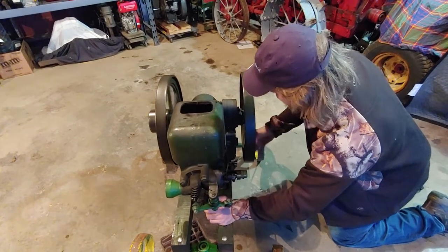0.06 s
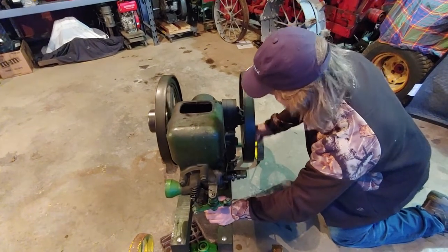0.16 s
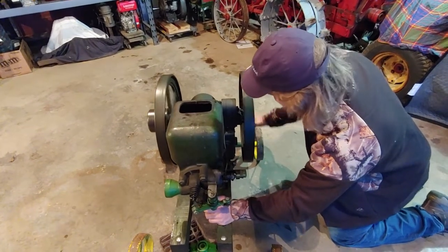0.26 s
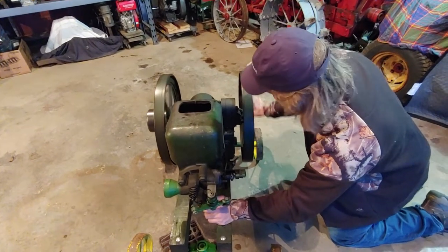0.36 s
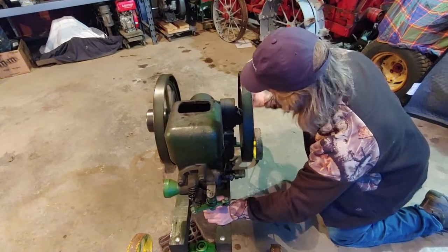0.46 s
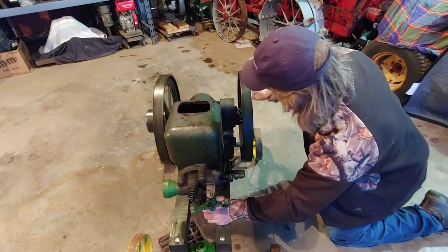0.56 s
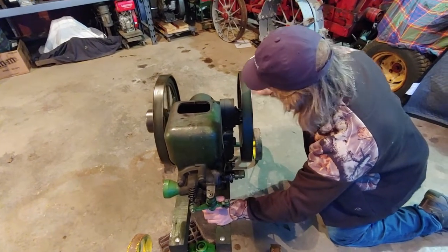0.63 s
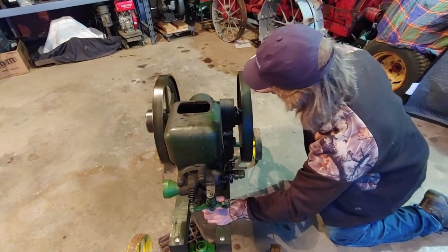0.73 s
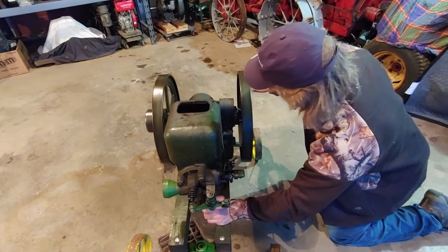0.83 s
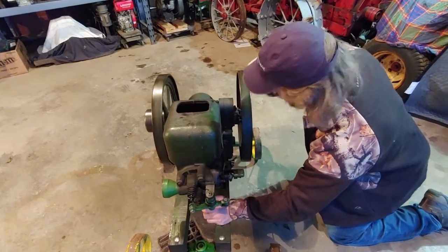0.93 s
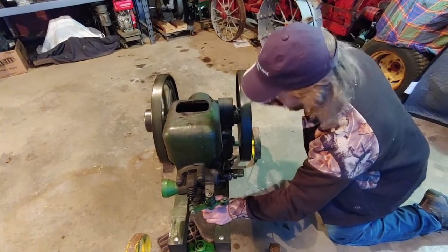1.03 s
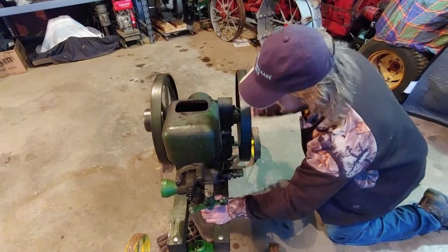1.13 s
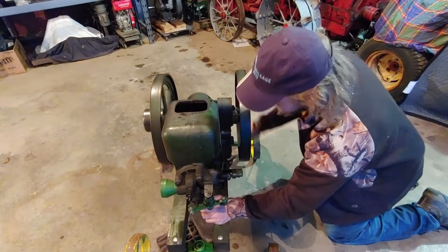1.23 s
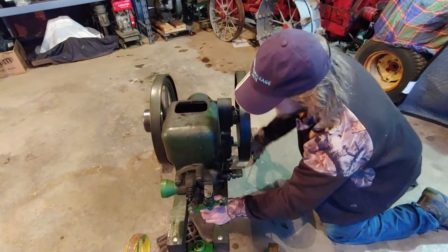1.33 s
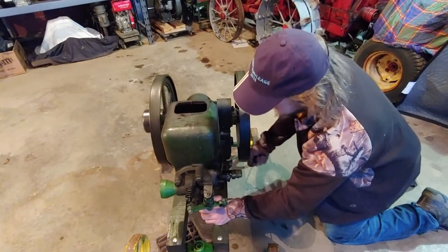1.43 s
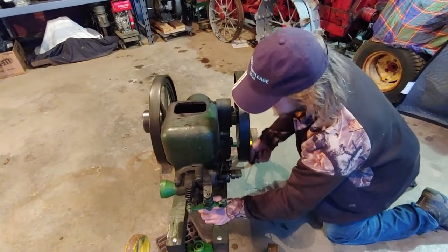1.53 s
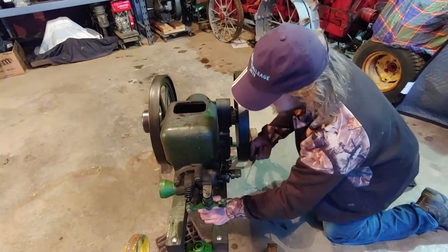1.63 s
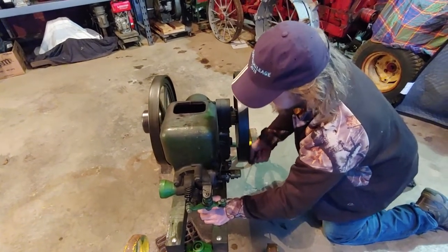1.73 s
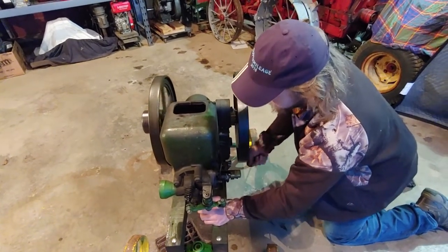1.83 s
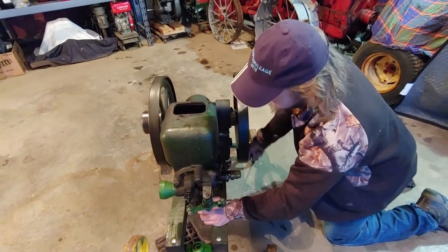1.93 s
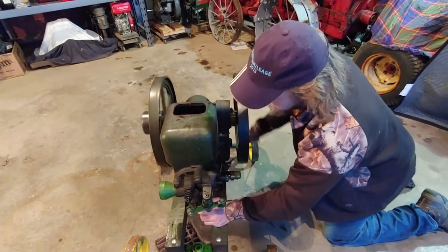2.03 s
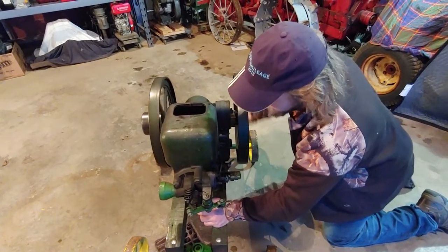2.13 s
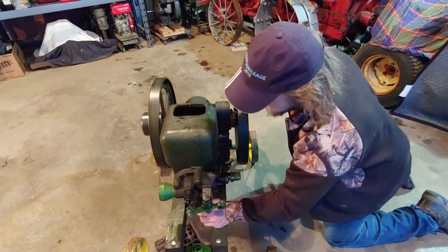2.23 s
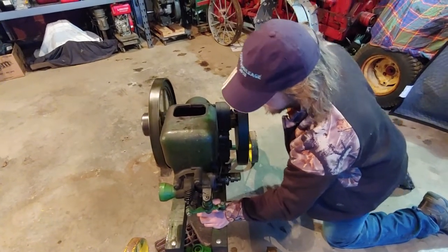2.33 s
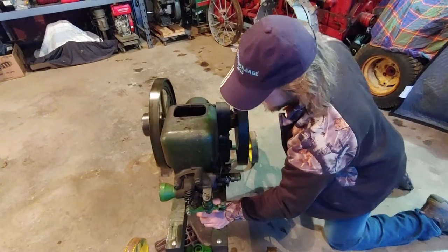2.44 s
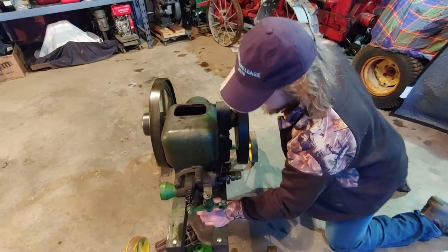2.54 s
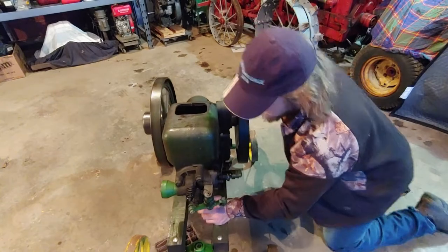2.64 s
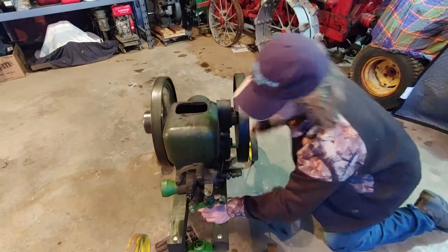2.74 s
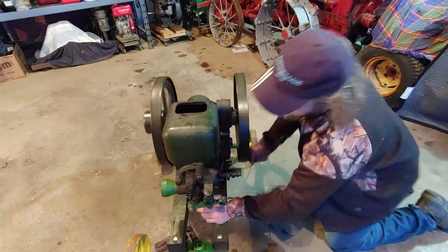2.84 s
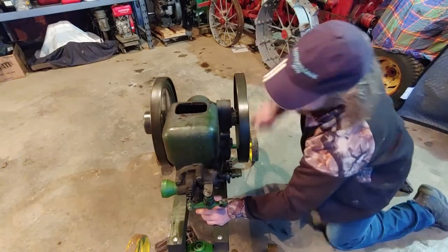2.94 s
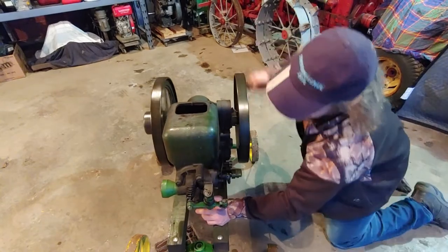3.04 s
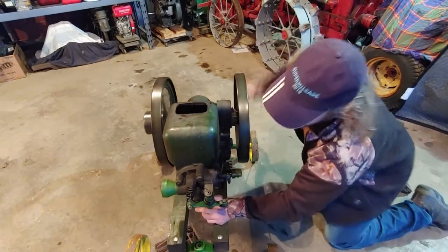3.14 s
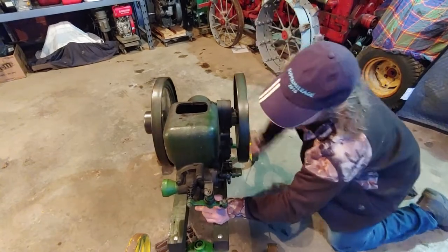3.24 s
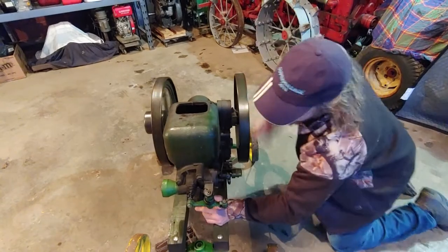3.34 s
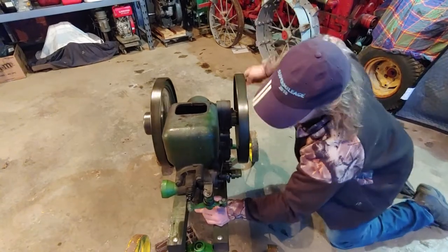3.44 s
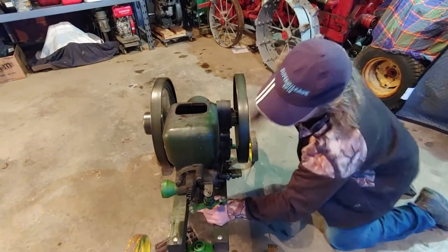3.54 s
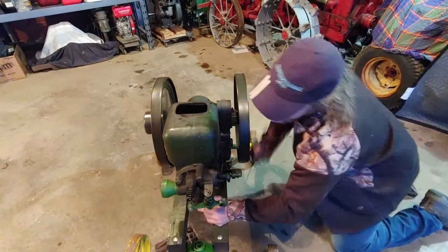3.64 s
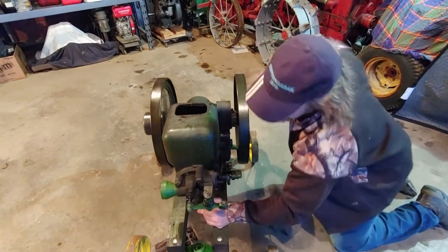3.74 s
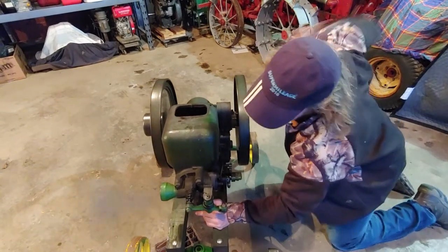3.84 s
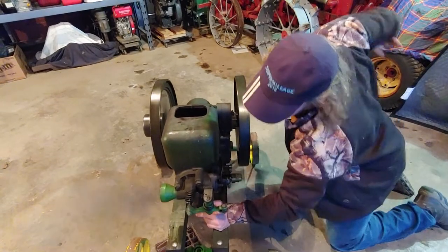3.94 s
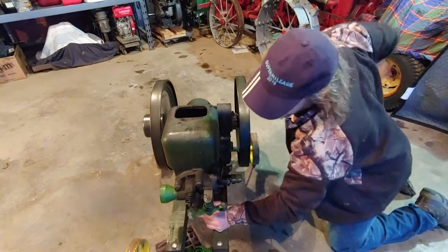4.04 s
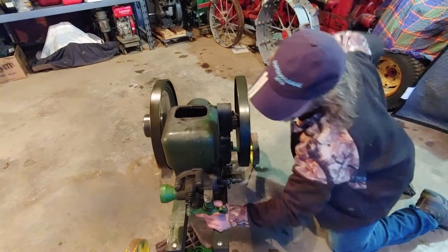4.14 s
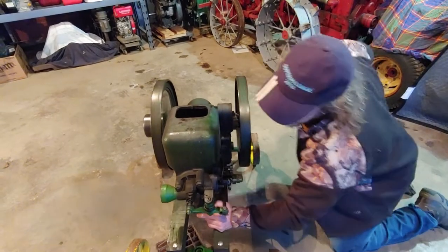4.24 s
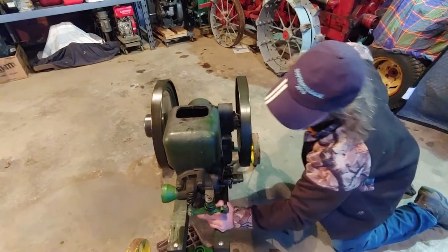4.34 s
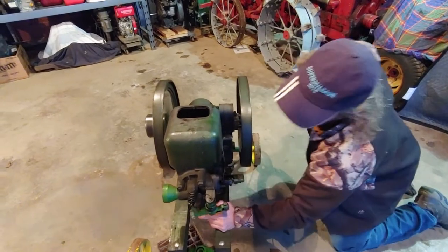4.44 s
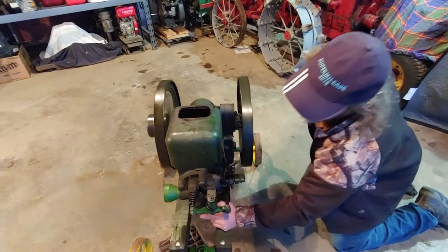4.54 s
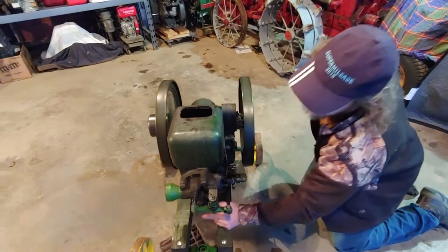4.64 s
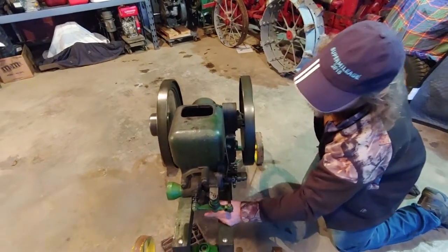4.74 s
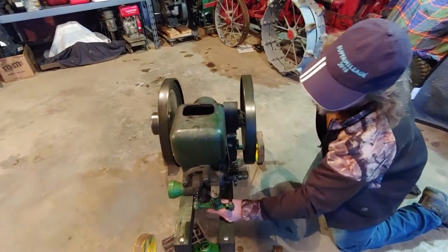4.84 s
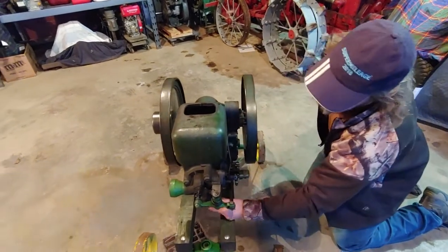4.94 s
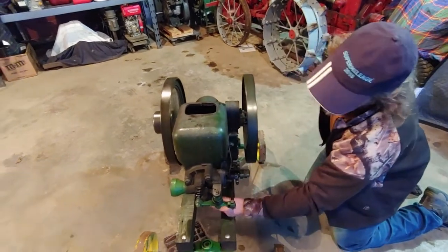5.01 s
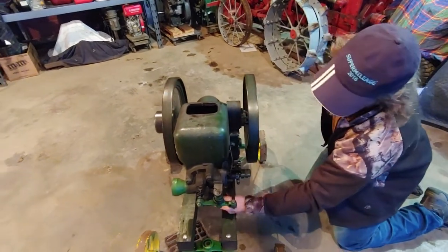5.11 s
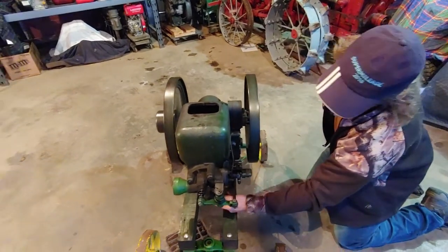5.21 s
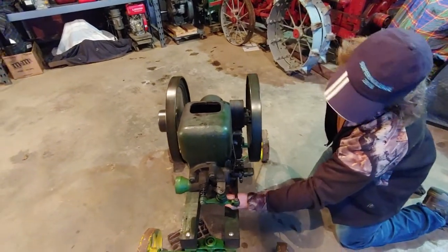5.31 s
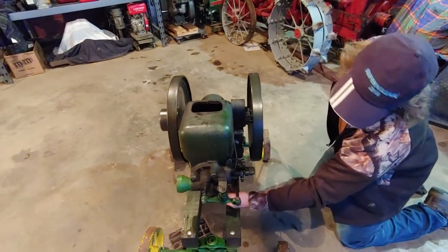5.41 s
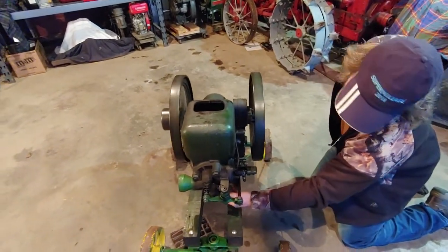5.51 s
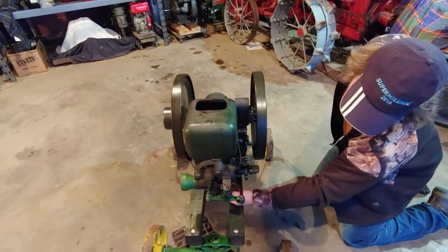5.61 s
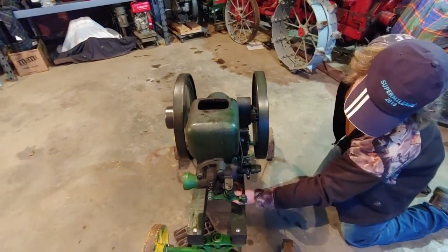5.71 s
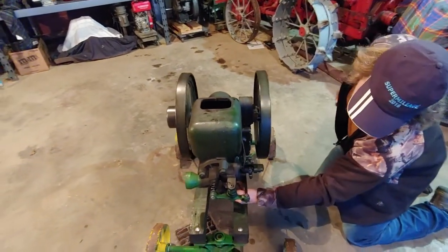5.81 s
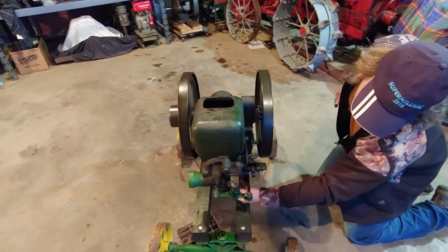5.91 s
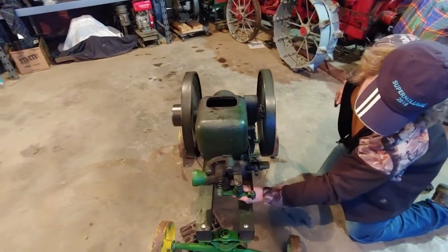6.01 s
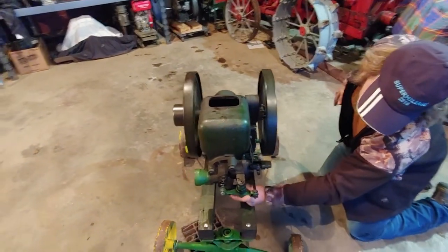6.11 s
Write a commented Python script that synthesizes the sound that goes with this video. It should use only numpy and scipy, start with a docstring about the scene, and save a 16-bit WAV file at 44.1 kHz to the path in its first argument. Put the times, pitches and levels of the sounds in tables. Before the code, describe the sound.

A close stereo microphone in a garage, loudest peaks clipping. At 0 s a loose steel crank handle clanks hard onto the shaft, several rattling contacts in 0.1 s with a bright ring; a weaker clank comes at 0.83 s. Until 2.5 s it is nearly quiet: faint room tone, small ticks, thin wheezes near 0.5, 1.4 and 2.3 s, a light igniter click at 1.98 s. From 2.65 s knocks and raspy air grow. Hard, dry igniter snaps hit at 3.03, 3.77, 4.18 and 4.58 s, among clacking valve gear, short breathy whistles and low cart hum. Charges fire at 3.87 and 4.66 s, each a sharp pop with muffler ring and strong falling hiss. From 4.85 to about 6.2 s the engine coasts: bright hissing pants, about six or seven a second, stronger and weaker alternating, rattling plates, low chuffs and a soft knock every second turn, slowing very slightly.

```python
"""An old single-cylinder engine in a garage: a steel crank handle clanks on, the flywheels are wound by hand,
air wheezes through the valves, the igniter snaps, two charges fire and the engine coasts, panting at every turn.
Air is coloured noise that swells with each stroke; metal is bursts of chatter sent through ringing modes.
The cart under it hums with filtered noise; a close stereo microphone clips the loudest peaks."""
import sys
import numpy as np
from scipy import signal
from scipy.fft import rfft, irfft, next_fast_len
from scipy.io import wavfile
from scipy.ndimage import uniform_filter1d, map_coordinates

SR = 44100
rng = np.random.default_rng(int(sys.argv[2]) if len(sys.argv) > 2 else 0)


def unload_wav(signal):
    """Save mono or channel-first audio to the path in sys.argv[1] as 16-bit WAV at rate SR, clipped to [-1, 1]."""
    wavfile.write(
        sys.argv[1],
        SR,
        np.round(np.clip(np.atleast_2d(signal).T, -1, 1) * 32767).astype(np.int16),
    )


N = 272052

# All levels in the tables are relative: the layers may scale them further.
# Strokes of one coasting cam cycle, two turns long. Each row: start in turns, length in turns,
# jet level in dB, pipe level in dB, chuff level in dB, change of the jet over the stroke in dB.
CAM_STROKES = [(0.018, 0.33, -13.5, -18.5, -27.5, -8), (.45, 0.49, -20, -24, -30.5, -5.5),
               (1.01, 0.39, -14.5, -18.5, -27, -6.5), (1.45, 0.35, -18, -23, -28, -6.5)]
# Colours of the three voices of the air. Each row: frequency in Hz, level in dB.
JET_COLOUR = [(2710, -20.5), (4600, -13), (7270, 2.5), (8380, -5), (11900, -17), (15500, -27)]
PIPE_COLOUR = [(710, -35), (1200, -24.5), (1420, -9.5), (1630, -7.5), (2240, -5), (2550, -1.5), (4700, -7),
               (6110, -36), (10300, -120)]
CHUFF_COLOUR = [(120, -17.5), (200, -9.5), (332, -1), (472, -3.5), (680, -4.5), (850, 1), (1250, -2),
                (1620, -43.5), (2750, -120)]
# Colour of the quiet room. Each row: frequency in Hz, level in dB.
ROOM_COLOUR = [(88, -31.5), (150, 8.5), (242, 5.5), (856, -40.5), (2570, -9), (7310, -16), (12000, -38.5),
               (15600, -60.5), (22000, -120)]
# How alike left and right are. Each row: frequency in Hz, likeness (1 is identical).
LIKENESS = [(60, .99), (300, .94), (700, .84), (1400, .5), (2500, .12)]
# How the two microphone ports differ. Each row: frequency in Hz, left minus right in dB.
PORT_LEAN = [(60, -0.5), (380, 1), (950, -1), (2380, -8), (5980, 5.5), (8200, -6), (11000, -4.5),
             (15000, 0)]
# Crank handle contacts. Each row: start in seconds, peak in dB, extra ring of the sleeve in dB,
# time for the chatter to fall 60 dB in seconds.
HANDLE_CONTACTS = [(0, 1.5, 24, 0.035), (.032, -5.5, 24.5, 0.098), (.056, -11, -9, 0.039),
                   (.08, -7.5, 18, 0.096), (.097, -14, 2, 0.26), (.357, -39.5, -17, 0.06),
                   (.395, -38, -26, 0.038), (.568, -39.5, -13.5, 0.057), (.812, -32, -16, 0.08),
                   (.832, -11, -10.5, 0.078), (.85, -22, -13, 0.2)]
# Ringing modes of the handle. Each row: frequency in Hz, level in dB, time to fall 60 dB in seconds.
HANDLE_MODES = [(982, -44, 0.59), (1690, -11, 0.27), (1786, -8.5, .6), (1847, -8.5, 0.31),
                (1866, -7.5, .35), (1968, -10.5, 0.57), (2340, -23, .17), (2890, -5.5, 0.43),
                (3000, -1, 0.31), (3263, -7, 0.34), (3517, 0.5, 0.58), (3920, -6.5, 0.21),
                (4170, -8.5, .25), (4340, -13, 0.2), (4710, -13.5, .2), (4940, -10.5, 0.28),
                (5530, -14.5, 0.24), (5700, -19.5, .22), (6180, -15, 0.15), (7140, -12.5, .16),
                (7604, -4.5, 0.22), (7820, -20.5, 0.2), (8330, -14.5, 0.2), (9400, -14.5, 0.11),
                (9920, -29.5, .2), (10350, -22, .12)]
# Igniter trips. Each row: start in seconds, peak in dB, extra ring above 6 kHz in dB,
# time for the chatter to fall 60 dB in seconds.
IGNITER_TRIPS = [(1.9804, -15, 1.5, 0.06), (3.0332, 3.5, -13.5, 0.014), (3.7652, 3, -19, 0.0052),
                 (4.1791, 3, -5.5, 0.0084), (4.5832, 3, -4.5, 0.018)]
# Ringing modes of the igniter. Each row: frequency in Hz, level in dB, time to fall 60 dB in seconds.
IGNITER_MODES = [(1540, -4, 0.067), (1878, -9.5, 0.33), (2570, -13, 0.057), (3620, -12.5, 0.11),
                 (3790, -23, 0.27), (4360, -20.5, 0.071), (5060, -11, 0.11), (5380, -15, 0.073),
                 (6400, -11, .09), (7830, -5.5, 0.065)]
# Ticks and knocks of push rod, cam and valves. Each row: start in seconds, bright level in dB,
# clank of the frame's upper modes in dB, clunk of its lower modes in dB, pitch it rings most near in Hz.
GEAR_KNOCKS = [(0.4964, -68, -35.5, -28, 2580), (0.591, -41, -38, -47, 1600),
               (1.1467, -63.5, -50, -43, 1170), (1.2648, -69, -38.5, -51.5, 2600),
               (1.4045, -73, -40.5, -27, 1580), (1.4504, -38, -39, -46, 1580),
               (2.129, -39.5, -48, -43, 1900), (2.254, -72, -33, -31, 2380), (2.3293, -30, -50, -43, 2600),
               (2.6547, -24, -39, -55, 3400), (2.7389, -39, -24, -20, 1150), (2.8586, -22, -37, -35, 800),
               (2.8746, -17.5, -32, -31, 1850), (3.0978, -22, -38, -26, 1850),
               (3.2139, -14, -16, -28, 1292), (3.234, -14, -47, -45, 1600), (3.476, -0.5, -29, -39, 2600),
               (3.4993, -4.5, -40, -42, 2900), (3.6002, -6, -30, -42, 2600), (3.622, -3, -28, -45, 2600),
               (4.0477, -5, -28, -33, 2400), (4.1, -1.5, -24, -36, 2404), (4.2522, -5.5, -21, -15.5, 1200),
               (4.2698, -2, -33, -40, 3400), (4.397, -3.5, -8.5, -7, 2483), (4.42, -13, -14, -12, 2390),
               (4.4468, -1, -22, -36, 2600), (5.343, -10.5, -13, -35, 1573), (5.5564, -6, -22, -34, 2600)]
# Charges that fire. Each row: start in seconds, level in dB.
FIRINGS = [(3.866, -4.5), (4.658, -7.5)]
# Resonances of the muffler. Each row: frequency in Hz, width in Hz, level in dB.
MUFFLER_MODES = [(313.6, 55, 4), (783, 123, -5), (1440, 400, -4.5)]
# Shaking of the cart. Each row: time in seconds, hum level in dB, thud level in dB.
CART_LEVELS = [(0, -68, -57.5), (.15, -41, -55.5), (.82, -68, -70.5), (1.45, -40.5, -52), (2.1, -67, -66),
               (2.4, -68.5, -60), (2.7, -37, -53), (3.42, -52, -51), (3.5, -38.5, -41), (3.69, -35.5, -50),
               (3.8, -57, -84), (3.88, -37, -32), (4.22, -44, -44), (4.37, -38, -40), (4.48, -32.5, -30.5),
               (4.6, -53.5, -58), (4.69, -38.5, -33), (5.24, -56, -48.5), (5.45, -34.5, -43),
               (6.17, -52.5, -57)]
# Short wavering whistles. Each row: start in seconds, length in seconds, start pitch in Hz,
# end pitch in Hz, width in Hz, level in dB.
WHISTLES = [(2.57, 0.2, 1500, 1440, 90, -45.5), (3.265, 0.055, 403, 483, 69.5, -28.5),
            (3.31, 0.082, 860, 855, 121, -33.5), (3.324, 0.074, 1560, 1550, 159, -27.5),
            (3.383, 0.037, 1620, 1680, 172, -20), (3.034, .13, 1607, 2025, 460, -25.5),
            (3.774, 0.071, 1562, 1940, 460, -24.5), (4.18, 0.098, 1600, 1990, 392, -25.5),
            (2.34, 0.16, 1900, 2670, 903, -42.5), (3.49, .16, 2800, 2900, 760, -24.5),
            (4.586, 0.12, 1600, 2100, 403.4, -26)]
# How the garage echo dies. Each row: frequency in Hz, time to fall 60 dB in seconds.
GARAGE_DECAY = [(200, 1), (2000, 0.31), (10000, 0.21)]
# Loose plates that the flow rattles (later raised to the power 1.5).
# Each row: frequency in Hz, width in Hz, level in dB.
PLATE_MODES = [(1125.6, 26, -0.5), (1334, 86, -1), (1647, 79, 4), (1861, 56, 2), (2040, 59, 2),
               (2425, 35, 0.5), (2595, 64, 1.5)]
# Broad colour of steel on steel (later cubed). Each row: frequency in Hz, width in Hz, level in dB.
STEEL_COLOUR = [(1680, 140, -6), (3300, 1300, -1.5), (5420, 1100, 1.5), (7600, 1900, 1)]
# Strokes that push or draw air while cranking and catching. Each row: start in seconds, length in seconds,
# jet hiss in dB, pipe rush in dB, low chuff in dB, change of the jet over the stroke in dB.
CRANKING_STROKES = [(.495, 0.11, -72, -61.5, -59, 1), (.57, 0.12, -54.5, -61, -81, -7),
                    (1.14, 0.25, -93, -82, -65.5, 22), (1.395, 0.072, -65, -70, -54, 2),
                    (1.445, 0.156, -49.5, -53.5, -59, 2), (1.82, 0.14, -63.5, -63.5, -75, -1),
                    (1.975, 0.041, -43.5, -43.5, -60, -13), (2.255, 0.073, -63, -54.5, -52.5, 7.5),
                    (2.33, 0.14, -45.5, -46.5, -61, 2), (2.53, 0.1, -46, -57, -76, 1),
                    (2.655, 0.091, -43.5, -46, -60, -1.5), (2.73, 0.04, -54, -47.5, -42, 5),
                    (2.87, 0.18, -36, -38.5, -49, 13), (3.035, 0.21, -19, -28, -51, -20),
                    (3.21, 0.041, -25, -27.5, -33.5, -10), (3.32, 0.14, -31, -33.5, -38, 5.5),
                    (3.475, 0.12, -14, -30.5, -65, -3), (3.63, 0.064, -25, -32.5, -37.5, -3),
                    (3.71, 0.053, -27.5, -39, -39.5, 8.5), (3.77, 0.092, -19.5, -28.5, -38.5, -9),
                    (3.863, 0.21, -10.5, -22.5, -38.5, -18.5), (4.04, 0.14, -21.5, -34, -41.5, 0),
                    (4.18, .06, -19, -26, -59, -7), (4.245, 0.1413, -24.5, -27, -33, -2.5),
                    (4.395, 0.075, -18.5, -25.5, -30.5, -0.5), (4.5, 0.099, -28.5, -57, -37, 3.5),
                    (4.585, 0.063, -23.5, -28, -28, 2.5), (4.657, 0.22, -8, -24, -36, -24.5)]
# Air that seeps between strokes. Each row: time in seconds, jet level in dB.
SEEPAGE = [(0, -68.5), (1.1, -77), (2.2, -70), (2.5, -70), (2.85, -51), (3.3, -41), (3.7, -37),
           (4.85, -30.5), (6.17, -27)]
# Where the modes of the loose grip sleeve lie. Each row: lowest Hz, highest Hz.
SLEEVE_BANDS = [(900, 1000), (7300, 7800)]
# The knock of each cam cycle. One row: bright level in dB, clank in dB, clunk in dB, pitch it rings near in Hz.
CYCLE_KNOCK = (-29, -20, -19.5, 1200)
# Modes of the cast-iron frame. Each row: frequency in Hz, width in Hz, level in dB.
FRAME_MODES = [(474, 84, -1), (760, 250, -1.5), (1226, 335, -4), (1583, 130, 0), (1900, 240, -6),
               (2403, 160, -4), (2650, 130, -2.5), (2980, 180, -9), (3570, 290, -10.5)]

COAST_S, TURN_S, SLOWING_S = 4.854, 0.1506, 0.0012  # first dead centre, first turn, each turn longer by
COAST_SWELL_DB_PER_S = 0.54
SETTLE_DB, SETTLE_S = -2.5, 0.059  # the first coasting strokes are weaker, and this soon fades
CAM_KNOCK_TURNS = 0.86  # place of the push rod's knock in the cam cycle
PIPE_FOLLOWS, CHUFF_FOLLOWS = 0.72, 0.06  # share of the jet's change
LEAK_PIPE_DB, LEAK_CHUFF_DB = 0.5, 1  # over the seeping jet
LEAK_CHUFF_TOP_DB = -50.5  # the chuff of the seepage grows no further
OPEN_S, CLOSE_T60_S = 0.024, 0.26  # rise of a stroke; time for its release to fall 60 dB
PIPE_LEADS_S = 0.007  # pipe and chuff speak before the jet
FULL_DB, SLOW_DB = -24, -53.5  # jet level of a fast and of a slow flow
SLOW_PIPE_HZ = 3736  # a slow flow keeps only the pipe's lower part
SLOW_RIGHT_DB = 0.5  # a slow flow leans right, towards the intake
PLATES_DB = 0.5  # plates' level over the pipe rush when its flow is at RATTLE_FROM_DB
RATTLE_FROM_DB, RATTLE_GROWS = -17.5, 0.35  # reference pipe level; rattle dB per dB of pipe flow
RISE_S, DULL_RISE_S = 0.00094, 0.001  # build-up of struck handle and igniter; of the frame's knocks
UPPER_HZ = 1000  # upper and lower modes of the frame part here
NEAR_DB, NEAR_OCTAVES = 9, 0.33  # modes close to the struck spot's pitch stand out
LOW_DROP_S, LOW_DROP_DB = 0.062, -9  # for this long after each trip the chuff and (by half the dB) the cart drop
PAUSE_TURNS, PAUSE_WIDTH_TURNS = -0.07, 0.09  # the piston halts by dead centre: place and width
PAUSE_EVEN_DB, PAUSE_ODD_DB = -4, -2  # depth of the halt at even and odd turns
TOP_HZ = 15665  # nothing is kept above this


def amp(db):
    """Turn decibels into a plain multiplier."""
    return 10 ** (np.asarray(db) / 20)


def along(points, hz):
    """Read (Hz, value) points on a log frequency axis, as pitch is heard."""
    f, v = np.transpose(points)
    return np.interp(np.log(hz + 1), np.log(f + 1), v)


def curves(rows, at):
    """Read each column after the first at the given places."""
    places, *columns = np.transpose(rows)
    return np.array([np.interp(at, places, column) for column in columns])


def wobble(rate):
    """A smooth random curve with `rate` knots a second."""
    knots = rng.standard_normal(int(N * rate / SR) + 4)
    return map_coordinates(knots, [np.arange(N) * rate / SR])


def filtered(x, response):
    """Multiply the spectrum of x by a response of frequency."""
    m = next_fast_len(N + SR // 2)
    return irfft(rfft(x, m) * response(np.fft.rfftfreq(m, 1 / SR)), m)[..., :N]


def resonances(modes):
    """Response of bodies that ring after being driven, from (Hz, width Hz, dB) modes of alternating sign."""
    def response(f):
        return sum((-1) ** k * amp(db) * 1j * f * w / (c * c - f * f + 1j * f * w)
                   for k, (c, w, db) in enumerate(modes))
    return response


def coloured(points):
    """A response that follows (Hz, dB) points."""
    return lambda hz: amp(along(points, hz))


def at_ports(x):
    """The microphone body shades one port against the other."""
    return filtered(x, lambda hz: amp(along(PORT_LEAN, hz) / 2 * np.array([[1], [-1]])))


def rush(response, grit_db, patchy_db=2):
    """Stereo turbulence, middle at rms 1: noise with uneven grain and drifting patches of colour."""
    grains = rng.standard_normal((2, N)) * amp(grit_db * wobble(700))
    z = signal.stft(grains, nperseg=256)[2]
    patches = uniform_filter1d(rng.standard_normal(z.shape[1:]), size=4, axis=0)
    patches = uniform_filter1d(patches, size=14, axis=1)
    pair = signal.istft(z * amp(patchy_db * patches / np.std(patches)), nperseg=256)[1][:, :N]

    def shares(hz):
        angle = np.arccos(np.clip(along(LIKENESS, hz), -1, 1)) / 2
        return response(hz) * [np.cos(angle), np.sin(angle)]

    shared, own = filtered(pair, shares)
    both = at_ports(np.array([shared + own, shared - own]))
    return both / np.std(both.mean(axis=0))


def struck(events, modes, extra_bands, bass_hz, grip_s, crack_db, crack_s, crack_grows, colour):
    """Every blow is a dying chatter of contacts: a coloured crack, and the ring of the modes it drives."""
    rings, cracks = np.zeros((2, N + SR)), np.zeros((2, N + SR))
    t = np.arange(SR // 3) / SR
    rise = 1 - np.exp(-t / RISE_S)
    # rough castings split every mode into a close cluster of four
    hz, level, t60 = np.repeat(np.transpose(modes), 4, axis=1)[..., None]
    hz = hz * (1 + 0.0045 * rng.standard_normal(hz.shape))
    tones = amp(-60 * t / np.clip(t60, 0.03, 0.5)) * np.sin(2 * np.pi * hz * t) * rise
    for s, db, extra_db, chatter_s in events:
        in_bands = sum((hz > low) * (hz < high) for low, high in extra_bands)
        size = amp(level + extra_db * in_bands + 2 * rng.standard_normal(hz.shape))
        ring = size[:, 0] @ tones
        chatter = [[1, 0.99], [1, -0.8]] @ rng.standard_normal((2, len(t)))
        chatter = chatter * amp(-60 * t / max(chatter_s, 0.005)) * rise
        body = signal.fftconvolve(chatter, ring[None], axes=1)[:, :len(t)]
        body *= amp(-30 * (t / grip_s) ** 3) / np.abs(body).max()  # contact closes and stops the ringing
        start = round(max(s, 0) * SR)
        rings[:, start:][:, :len(t)] += amp(db) * body
        crack = amp(crack_grows * db + crack_db - 60 * t / crack_s) * rise
        cracks[:, start:][:, :len(t)] += crack * rng.standard_normal((2, len(t)))
    no_bass = signal.butter(4, bass_hz, "high", fs=SR, output="sos")  # small parts radiate no bass
    return signal.sosfilt(no_bass, rings[:, :N] + filtered(cracks[:, :N], colour))


def handle():
    """The loose steel crank rattles on the shaft, a little to the right; the hand damps it."""
    def colour(hz):
        return resonances(STEEL_COLOUR)(hz) ** 3
    rattle = struck(HANDLE_CONTACTS, HANDLE_MODES, SLEEVE_BANDS, bass_hz=850, grip_s=0.24,
                    crack_db=-11.0, crack_s=0.19, crack_grows=1.3, colour=colour)
    return at_ports(rattle) * amp([[-1.2], [1.2]])


def low_drop_db():
    """The brief drop of the low sounds after each trip."""
    t = np.arange(N) / SR
    dropped = sum((t > s) * (t < s + LOW_DROP_S) for s, *_ in IGNITER_TRIPS)
    return LOW_DROP_DB * uniform_filter1d(dropped * 1.0, size=300)


def cart():
    """The wooden cart shakes on its wheels: a fuzzy hum with an overtone, and a deeper thud."""
    levels_db = curves(CART_LEVELS, np.arange(N) / SR)
    hum, thud = amp(levels_db + low_drop_db() / 2 + 1.6 * wobble(12))

    def shake(modes):
        return rush(lambda hz: resonances(modes)(hz) ** 2, grit_db=-8.0, patchy_db=-1.0)

    return hum * shake([(109.0, 16.2, 4.0), (189.4, 42, -3.0)]) + thud * shake([(50.1, 54, 0)])


def room_tone():
    """The quiet room: steady, faint coloured noise."""
    return amp(-68.5) * rush(coloured(ROOM_COLOUR), grit_db=0.5)


def crank_time(turns):
    """Seconds at which the coasting, slowing flywheel has made so many turns."""
    return COAST_S + TURN_S * turns + SLOWING_S * turns ** 2 / 2


def strokes():
    """The listed cranking strokes, then the cam cycle repeated at flywheel speed."""
    coasting = []
    for cycle in range(5):
        for start, length, *level_db, change_db in CAM_STROKES:
            s = crank_time(2 * cycle + start)
            length_s = crank_time(2 * cycle + start + length) - s
            swell_db = COAST_SWELL_DB_PER_S * (s - COAST_S)
            swell_db += SETTLE_DB * np.exp((COAST_S - s) / SETTLE_S)
            coasting.append((s, length_s, *np.add(level_db, swell_db), change_db))
    return CRANKING_STROKES + coasting


def air_levels():
    """Jet, pipe and chuff dB: each stroke opens, drifts and closes over the seepage; powers add."""
    t = np.arange(N) / SR
    leak_db, = curves(SEEPAGE, t)
    leak_chuff_db = np.minimum(leak_db + LEAK_CHUFF_DB, LEAK_CHUFF_TOP_DB)
    power = amp([leak_db, leak_db + LEAK_PIPE_DB, leak_chuff_db]) ** 2
    lead = np.array([[0], [PIPE_LEADS_S], [PIPE_LEADS_S]])
    follows = np.array([[1], [PIPE_FOLLOWS], [CHUFF_FOLLOWS]])
    for s, length, *level_db, change_db in strokes():
        span = slice(round((s - PIPE_LEADS_S) * SR), round((s + length + CLOSE_T60_S) * SR))
        u = t[span] - s + lead
        drift_db = change_db * np.clip(u / length, 0, 1) * follows
        close_db = -60 * np.clip(u - length, 0, None) / CLOSE_T60_S
        opening = np.sin(np.pi / 2 * np.clip(u / OPEN_S, 0, 1))
        power[:, span] += (opening * amp(np.array(level_db)[:, None] + drift_db + close_db)) ** 2
    return 10 * np.log10(power)


def pause_db():
    """The flow dips as the coasting piston halts by each dead centre."""
    t = np.arange(N) / SR
    dips = 0
    for turn in range(1, 9):
        depth_db = PAUSE_EVEN_DB if turn % 2 == 0 else PAUSE_ODD_DB
        away = (t - crank_time(turn + PAUSE_TURNS)) / (PAUSE_WIDTH_TURNS * TURN_S)
        dips = dips + depth_db * np.exp(-away ** 2)
    return dips


def valve_air():
    """Three voices of the same flow: jet hiss, pipe rush with rattling plates, and low chuff."""
    jet_db, pipe_db, chuff_db = air_levels() + pause_db() + 0.63 * wobble(60)
    slow = np.clip((FULL_DB - jet_db) / (FULL_DB - SLOW_DB), 0, 1)
    jet = rush(coloured(JET_COLOUR), grit_db=1.5, patchy_db=1.5)
    # a slow flow keeps only the core of the jet
    core = filtered(jet, lambda hz: np.abs(resonances([(7500, 4300, 0.0048)])(hz)) ** 2)
    jet = jet + slow * (core - jet)
    plates = rush(lambda hz: resonances(PLATE_MODES)(hz) ** 1.5, grit_db=4, patchy_db=2.5)
    rattle_db = PLATES_DB + RATTLE_GROWS * np.clip(pipe_db - RATTLE_FROM_DB, -15, 5)
    pipe = rush(coloured(PIPE_COLOUR), grit_db=0.0, patchy_db=3.0) + plates * amp(rattle_db)
    lower = filtered(pipe, lambda hz: 1 / (1 + (hz / SLOW_PIPE_HZ) ** 6))
    pipe = pipe + slow * (lower - pipe)
    pipe = pipe * amp(1.2 * wobble(45) + 4 * slow * wobble(160))  # the pipe flutters; a slow flow rasps
    chuff = rush(coloured(CHUFF_COLOUR), grit_db=1.5, patchy_db=2.0)
    flow = (amp(jet_db) * jet + amp(pipe_db) * pipe) * amp(SLOW_RIGHT_DB * slow * [[-1], [1]])
    return flow + amp(chuff_db + low_drop_db()) * chuff


def valve_gear():
    """Each contact is bright steel chatter that also sets the iron frame ringing, each spot in its own way."""
    t = np.arange(SR // 8) / SR
    bright, frame = np.zeros(N + SR), np.zeros((2, N + SR))
    tick = amp(-6 - 60 * t / 0.049) * (1 - np.exp(-t / 0.002))
    knock = amp(-60 * t / 0.068) * (1 - np.exp(-t / DULL_RISE_S))
    chatter = [[1, 0.6], [1, -0.6]] @ rng.standard_normal((2, N)) * amp(4 * wobble(500))
    chatter = np.pad(at_ports(chatter), ((0, 0), (0, SR)))
    hz, width_hz, db = np.transpose(FRAME_MODES)[..., None]
    fade = np.pi * width_hz * t
    tones = width_hz * fade * np.exp(-fade) * np.sin(2 * np.pi * hz * t) * 2 * np.pi / SR
    cam_knocks = [(crank_time(2 * cycle + CAM_KNOCK_TURNS), *CYCLE_KNOCK) for cycle in range(4)]
    for s, bright_db, clank_db, clunk_db, near_hz in GEAR_KNOCKS + cam_knocks:
        span = slice(round(s * SR), round(s * SR) + len(t))
        near_db = NEAR_DB * np.exp(-(np.log2(hz / near_hz) / NEAR_OCTAVES) ** 2)
        blow_db = np.where(hz > UPPER_HZ, clank_db, clunk_db)
        size = amp(blow_db + db + near_db + 2 * rng.standard_normal(hz.shape))
        ring = size[:, 0] @ tones
        bright[span] += amp(bright_db) * tick
        body = signal.fftconvolve(knock * chatter[:, span], ring[None], axes=1)[:, :len(t)]
        # the blow sets the strength, not the luck of the noise
        frame[:, span] += body * np.linalg.norm(ring) * np.linalg.norm(knock) / np.linalg.norm(body)
    steel = rush(lambda hz: amp(along(JET_COLOUR, hz)) / (1 + (hz / 11000) ** 8), grit_db=1.5)
    return bright[:N] * steel + amp(13.5) * frame[:, :N]


def igniter():
    """A sprung hammer slips off the trip: a hard, bright crack and a short ring."""
    colour = resonances([(2000, 280, -16.0), (8000, 1600, 5.0)])
    snaps = struck(IGNITER_TRIPS, IGNITER_MODES, [(6000, SR)], bass_hz=1360, grip_s=0.21,
                   crack_db=5.5, crack_s=0.019, crack_grows=3.5, colour=colour)
    return amp(-8.5) * snaps * amp([[-1.5], [1.5]])


def whistles():
    """Bands of noise around a faint tone that glide while a valve port opens or closes."""
    out = np.zeros((2, N))
    for s, length, start_hz, end_hz, width_hz, db in WHISTLES:
        u = np.arange(round(length * SR)) / (length * SR)
        cycles = length * (start_hz * u + (end_hz - start_hz) * u ** 2 / 2)
        carrier = np.exp(2j * np.pi * cycles)
        knots = rng.standard_normal((2, 2, 200))
        spread = np.array([[map_coordinates(k, [u * length * width_hz + 2]) for k in pair] for pair in knots])
        band = (spread[0] + 1j * spread[1]) * carrier + 0.1 * carrier
        swell = np.sqrt(np.sin(np.pi * u ** 0.75))
        out[:, round(s * SR):][:, :len(u)] += amp(db) * band.real * swell
    return out


def firing():
    """A pressure front leaves the muffler and rings it."""
    front = np.zeros(N)
    u = np.arange(400) / SR / 0.00013  # the front peaks after 0.13 ms
    for s, db in FIRINGS:
        front[round(s * SR):][:len(u)] += amp(db + 21) * u * np.exp(-u)
    return filtered(front, resonances(MUFFLER_MODES)) * np.ones((2, 1))


def garage(x):
    """The room's answer is noise in which each frequency dies at its own speed."""
    hz, t, z = signal.stft(rng.standard_normal((2, SR // 2)), SR, nperseg=256)
    fade = amp(-60 * t / along(GARAGE_DECAY, hz)[:, None])
    tail = signal.istft(z * fade, SR, nperseg=256)[1]
    late = np.pad(x, ((0, 0), (200, 0)))  # the answer starts 200 samples later
    return signal.fftconvolve(late, tail / np.linalg.norm(tail[0]), axes=1)[:, :N]


def scene():
    """Igniter, valve gear and firing echo in the garage; the other layers are added without echo."""
    hits = igniter() + valve_gear() + firing()
    echo = amp(-9.0) * garage(hits)
    return handle() + cart() + room_tone() + valve_air() + whistles() + hits + echo


def record(dry):
    """The microphone drops the deepest bass, the loudest peaks clip; nothing is kept above the band limit."""
    dry = filtered(dry, lambda hz: 1 / (1 + (32 / (hz + 1)) ** 4))
    clipped = dry / (1 + np.abs(dry / 1.05) ** 8) ** (1 / 8)
    return filtered(clipped, lambda hz: hz < TOP_HZ)


dry = scene()
out = record(dry)
unload_wav(out)
```